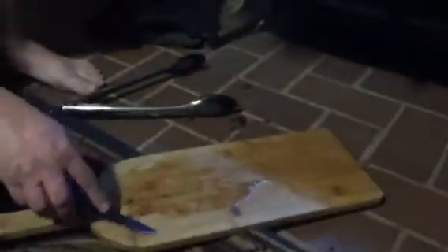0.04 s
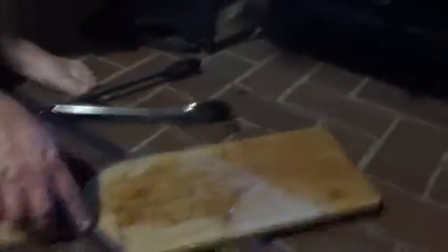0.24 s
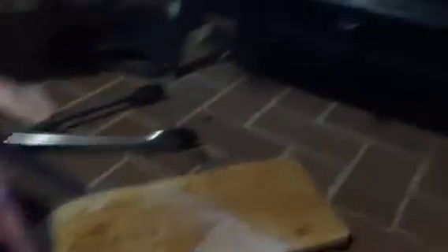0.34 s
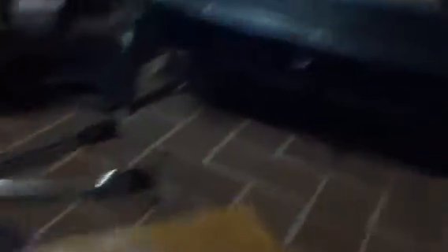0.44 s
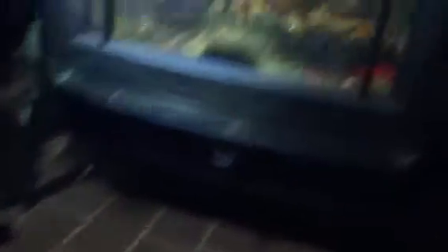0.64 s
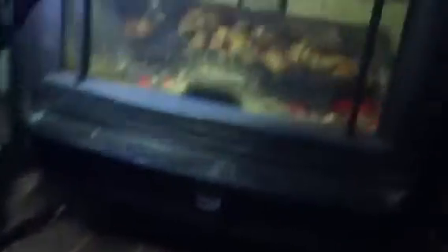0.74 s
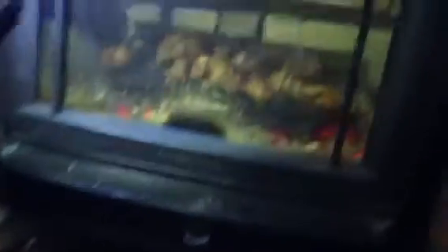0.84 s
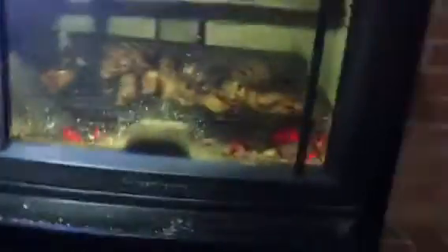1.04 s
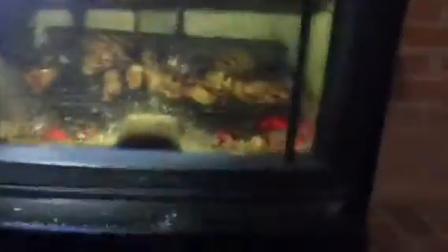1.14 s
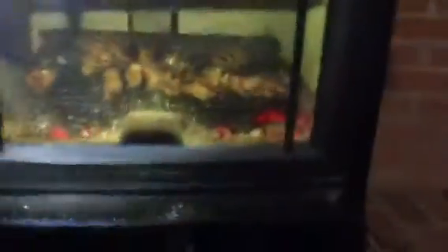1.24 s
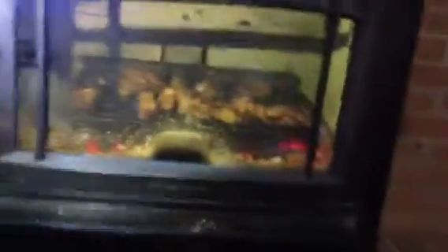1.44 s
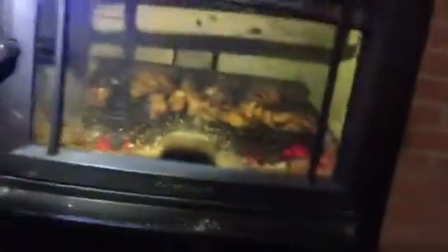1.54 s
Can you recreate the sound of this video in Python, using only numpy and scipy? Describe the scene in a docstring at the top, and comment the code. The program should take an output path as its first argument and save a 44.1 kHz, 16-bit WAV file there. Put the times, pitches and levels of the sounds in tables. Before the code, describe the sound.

Wood knocks and rattles on brick as a knife and tongs are laid down, first spaced, then in a quick tumbling run, fading to small taps and a soft rustle in a lightly echoing room.

```python
"""A brick hearth: a wooden board rattles while a knife and tongs knock against it and are laid down.
Each knock sums the board's decaying modes with a short noise crack; steel rings as clusters of partials.
Filtered noise makes short gritty bursts, a spray of tiny ticks and a late soft rustle.
Noise echoes give a near-wall reflection and a tail, over a stove fan's hum and faint hiss."""
import sys
import numpy as np
from scipy import signal
from scipy.fft import rfft, irfft
from scipy.io import wavfile
from scipy.ndimage import uniform_filter1d

SR = 44100
rng = np.random.default_rng(int(sys.argv[2]) if len(sys.argv) > 2 else 0)


def waveform_to_disk(signal):
    """Save audio, clipped to [-1, 1], as 16-bit WAV at the path in sys.argv[1]."""
    frames = np.transpose(np.atleast_2d(signal))
    scaled = np.clip(frames, -1, 1) * 32767
    samples = np.round(scaled).astype(np.int16)
    wavfile.write(sys.argv[1], SR, samples)


N = 70560  # length in samples


def undb(db):
    """Turn decibels into an amplitude factor."""
    return 10 ** (np.asarray(db) / 20)


def unit(x):
    """Scale x to an RMS of 1."""
    return x / np.sqrt(np.mean(x ** 2))


def shaped(x, table, length):
    """Colour x by (f/Hz, level/dB) points joined on a log-frequency axis."""
    hz, db = np.array(table, float).T
    f = np.maximum(np.fft.rfftfreq(length, 1 / SR), 1)
    gain = undb(np.interp(np.log(f), np.log(hz), db))
    return irfft(rfft(x, length) * gain, length)


def band(x, hz, width):
    """Steep band-pass around hz, width in Hz."""
    edges = np.clip([hz - width / 2, hz + width / 2], 20, .45 * SR)
    return signal.sosfilt(signal.butter(3, edges, "bandpass", fs=SR, output="sos"), x)


def walk(rate):
    """Slow random wander of RMS 1: held random values, rate per second, smoothed twice."""
    hold = int(SR / rate)
    steps = np.repeat(rng.standard_normal(N // hold + 1), hold)
    return unit(uniform_filter1d(uniform_filter1d(steps, hold), hold)[:N])


def add(out, s, x):
    """Mix x into out at s seconds."""
    i = int(s * SR)
    out[i:i + len(x)] += x[:N - i]


def decay(t, t60):
    """Exponential fall that loses 60 dB in t60 seconds."""
    return np.exp(-np.log(1000) * t / t60)


def ring(hz, db, t60, rise_s):
    """Sum of decaying modes, each swelling over its own rise time."""
    t = np.arange(SR // 3) / SR
    swell = (1 - np.exp(-t / rise_s[:, None])) ** 2
    modes = swell * decay(t, t60[:, None]) * np.sin(2 * np.pi * hz[:, None] * t)
    return undb(db) @ modes


# Spectral tilt of the fan's air noise, relative: f/Hz, level/dB (per Hz)
AIR_TILT = [(18, -48.5), (30, -22), (131, 1.5), (227, -6), (303, -6), (962, -22.5), (1250, -15),
            (1390, -23), (1590, -24.5), (6050, -28), (16000, -36.5)]
# Pitches of the three hum lines: f/Hz
HUM_HZ = [63, 123.2, 161.3]
# Irregular, chance-like level wander of each hum line, before the added waver:
# t/s, then level/dB (RMS) of each line
HUM_LEVELS = [(0.0, -85, -60, -51.5), (0.062, -83, -54.5, -93), (0.28, -78, -63, -59),
              (0.316, -70, -56, -103), (0.502, -91, -76, -83), (0.552, -83, -73, -56),
              (0.622, -80, -70, -69), (0.69, -78, -50.5, -59), (0.752, -80, -72, -64),
              (0.832, -83, -57, -68), (0.89, -72, -68, -71), (0.984, -79, -60.5, -71),
              (1.032, -77, -84, -55.5), (1.122, -82, -61.5, -72.5), (1.572, -81.5, -65, -66),
              (1.6, -80, -73.5, -75)]
AIR_DB = -60.5  # RMS before its slow drift
HUM_WAVER_DB, HUM_WAVER_TURNS = 3, 0.24  # RMS wander of level, and of phase in cycles


def stove():
    """Fan: drifting coloured air noise with three hum lines that waver in level and phase."""
    t = np.arange(N) / SR
    air = undb(AIR_DB) * unit(shaped(rng.standard_normal(N), AIR_TILT, N))
    s, *levels = np.array(HUM_LEVELS).T
    hum = np.zeros(N)
    for hz, db in zip(HUM_HZ, levels):
        level = np.interp(t, s, db) + HUM_WAVER_DB * walk(20)
        turns = hz * t + HUM_WAVER_TURNS * walk(11)
        hum += np.sqrt(2) * undb(level) * np.sin(2 * np.pi * turns)
    return air * undb(.8 * walk(3.3)) + hum


# Centre pitch of each steel mode: f/Hz
STEEL_HZ = [1604, 2085, 2470, 3370, 3770, 4230, 4990, 5400, 5780, 6200, 8100, 9000, 11640]
# The same modes, before each touch's leaning and ring factor: level/dB, t60/s
STEEL_MODES = [(-2.5, .12), (2, 0.073), (-5.5, 0.051), (0.5, .12), (4, 0.047), (-12, 0.042), (-9.5, 0.05),
               (-12, 0.062), (0, .13), (-1, 0.074), (-13.5, .15), (-6.5, 0.12), (-1, 0.082)]
# Touches of steel: t/s, level/dB, best-excited f/Hz, reach/octaves, ring-time factor, contact/ms
CLINKS = [(.001, -62, 2386, 0.6, 1.84, 0.15), (.003, -47.5, 4950, 0.1, 2.5, 1.2),
          (.140, -43.5, 6940, 1, 0.48, .3), (.142, -42.5, 3770, .06, 0.98, 1.2),
          (.146, -55.5, 9900, 0.32, 1.6, 5.6), (.150, -44.5, 5900, .2, .9, 3.6),
          (.159, -41, 2090, .15, .4, 2), (.240, -64, 8100, .1, 1.5, 4.), (.249, -69, 11000, 0.33, 1.9, 6.8),
          (1.248, -40.5, 2085, .08, 1.9, 0.23), (1.266, -54, 2085, .08, 0.91, 2.7)]
STEEL_SPLIT = 0.013  # relative pitch spread within a mode's cluster
PARTIALS = 5  # per mode


def steel():
    """Blade and tongs ring thin and rough; each touch favours the modes near one pitch."""
    out = np.zeros(N)
    hz = np.repeat(STEEL_HZ, PARTIALS)
    db, t60 = np.repeat(STEEL_MODES, PARTIALS, axis=0).T
    chance = rng.standard_normal((len(CLINKS), 2, len(hz)))
    for (s, level, best_hz, reach, ring_on, contact_ms), (pitch_luck, level_luck) in zip(CLINKS, chance):
        lean_db = -6 * (np.log2(hz / best_hz) / reach) ** 2
        rise_s = .5 / hz + contact_ms / 1000
        partial_db = level + db + lean_db + 2.2 * level_luck
        add(out, s, ring(hz * (1 + STEEL_SPLIT * pitch_luck), partial_db, ring_on * t60, rise_s))
    return out


# Decay of the tail by band: f/Hz, t60/s
ROOM_DECAY = [(600, 0.48), (1000, 0.68), (2000, .5), (4000, 0.27), (8000, 0.34), (14000, 0.17)]
# Balance of the same bands, before the overall tail gain: f/Hz, level/dB
ROOM_TONE = [(600, -2), (1000, 1), (2000, -2), (4000, -8.5), (8000, -9), (14000, -12.5)]
ROOM_DB = -10  # gain of the whole tail
WALL_S, WALL_SPREAD_S, WALL_DB = .022, 0.019, -8.5  # echo centre, smear and gain
WALL_HZ, WALL_WIDTH_HZ = 1500, 2200
ROOM_LOW_HZ = 420  # the small board sends little below this into the room


def room(feed):
    """A smeared echo from the near wall and a tail that dies band by band, as noise convolution."""
    low_cut = signal.butter(6, ROOM_LOW_HZ, "highpass", fs=SR, output="sos")
    t = np.arange(SR) / SR
    tail = np.zeros(SR)
    for (hz, t60), (_, db) in zip(ROOM_DECAY, ROOM_TONE):
        fall = decay(t, t60) * (1 - np.exp(-t / 0.019))  # soft onset
        fall /= np.sqrt(np.sum(fall ** 2))
        tail += undb(db) * band(rng.standard_normal(SR), hz, .7 * hz) * fall
    smear = np.exp(-.5 * ((t - WALL_S) / WALL_SPREAD_S) ** 2)
    smear /= np.sqrt(np.sum(smear ** 2))
    wall = band(rng.standard_normal(SR), WALL_HZ, WALL_WIDTH_HZ) * smear
    response = undb(ROOM_DB) * tail + undb(WALL_DB) * wall
    return signal.fftconvolve(signal.sosfilt(low_cut, feed), response)[:N]


# Points where each knock's colour is set: f/Hz
STRIKE_HZ = [210, 478, 550, 675, 930, 1290, 1850, 3500, 6700, 12000]
# Knocks: t/s, room send level/dB, contact/ms, then strike level/dB near each of STRIKE_HZ;
# where a knock lands on the board sets its colour
KNOCKS = [(0.127, -9.5, 4.2, -65, -66, -61.5, -58, -58, -56.5, -54, -70, -50, -58),
          (0.139, -6.5, 0.44, -62.5, -32.5, -41, -28.5, -44.5, -29.5, -39, -29, -37.5, -30),
          (0.1425, 1, 0.37, -55, -61, -40, -31, -59, -68, -26, -31.5, -48, -40),
          (0.2075, -3, 0.54, -46, -28.5, -18.5, -26.5, -23.5, -25, -30.5, -26, -45, -54),
          (0.242, 5, 1.3, -47, -32.5, -36, -36, -36.5, -30.5, -34, -42, -45, -66),
          (0.3155, -4.5, 1.05, -42.5, -28.5, -10.5, -28.5, -21, -73, -11, -29.5, -37, -52),
          (0.321, 2.5, 0.94, -70, -32.5, -24, -28, -28, -19, -46, -33.5, -61, -69),
          (0.522, 6.5, 1.8, -68, -65, -87, -72, -49.5, -55.5, -51, -48.5, -57, -70),
          (0.545, -12, 0.84, -33.5, -23, -30, -15.5, -14, -9, -11.5, -1.5, -19.5, -34),
          (0.5765, -7.5, 0.23, -42.5, -20, -38.5, -18.5, -21, -18, -18.5, -12.5, -33, -65),
          (0.59, 3.5, 1.8, -46, -27.5, -39.5, -33.5, -27, -21.5, -21, -40, -66, -74),
          (0.608, -6, 0.7, -71, -53, -50, -56, -25, -50, -43, -57.5, -65, -69),
          (0.63, -5, 1, -45, -51.5, -31.5, -15.5, -20, -35, -27.5, -23, -58, -72),
          (0.653, 2, 0.55, -44, -64, -56, -59, -37.5, -29.5, -49, -58, -61, -72),
          (0.686, -7.5, 0.77, -33.5, -28.5, -33.5, -17, -17.5, -21.5, -18.5, -13, -29.5, -59.5),
          (0.716, 3.5, 2.1, -38.5, -20.5, -66.5, -43.5, -27.5, -40, -35, -57, -45.5, -68),
          (0.736, -5, 2, -46, -34, -38, -18.5, -21.5, -35.5, -29, -29.5, -42.5, -66.5),
          (0.752, -6, 1.57, -39.5, -28, -44, -35.5, -20, -23.5, -16, -29, -59, -63),
          (0.776, -7.5, 0.67, -54, -52.5, -42.5, -25, -28, -43, -45, -39, -56, -78),
          (0.791, -17, 0.7, -59.5, -31.5, -59.5, -30.5, -52, -55, -57, -46.5, -79.5, -81),
          (0.804, -10.5, 1.7, -77.5, -59, -63.5, -31.5, -32, -64, -47, -46, -77, -84.5),
          (0.832, -3, 1.66, -71, -50.5, -36.5, -41, -55.5, -63, -47, -53, -80, -85),
          (0.904, -11, 5, -63, -46.5, -49.5, -34, -47, -70, -53, -65, -87, -87.5),
          (1.045, -2, 2.35, -81.5, -52.5, -64.5, -34.5, -47, -47, -47.5, -69, -82, -89),
          (1.057, -2.5, 2.8, -82, -57, -53, -44, -45.5, -66, -41.5, -56.5, -65.5, -72),
          (1.126, -5.5, 2.2, -63, -64, -65, -47, -56.5, -67.5, -60.5, -68, -84.5, -88),
          (1.247, -4, 0.65, -50.5, -49, -21.5, -32.5, -36.5, -38, -24.5, -34.5, -35.5, -53),
          (1.325, -9.5, 0.7, -52, -64.5, -76, -51, -69, -77.5, -51, -60, -78.5, -91)]
# Modes of the board, before each knock's colour and detune: f/Hz, level/dB, t60/s
BOARD_MODES = [(204, 7.5, 0.048), (482.5, -4, 0.16), (563.6, 0, 0.04), (671.5, -0.5, .09),
               (697.3, -4.5, 0.081), (878, 1.5, 0.04), (966, 1.5, 0.048), (1127, -13, 0.088),
               (1302, -3.5, 0.035), (1360, -9, .05), (1637, -5, 0.037), (1757, 3.5, 0.025),
               (2092, -7, 0.027), (2359, -9, 0.027), (2908, -7.5, 0.018), (3453, -10, 0.02),
               (3630, -9.5, 0.019), (4075, -9.5, 0.017)]
# Ring time of the crack in the three top strike bands: t60/s
CRACK_T60_S = [0.014, 0.014, 0.0027]
RISE_CYCLES, DETUNE, SCATTER_DB = 0.9, 0.0091, 3.5  # rise per mode; relative pitch and level spread
BOARD_DB, CRACK_DB = 4.5, -4
# The walls also get the many weak modes that miss the microphone
SPREAD_DB, SPREAD_T60_S = 0.5, .03


def board():
    """Every knock rings slightly detuned wood modes and a noisy crack; returns direct and room feed."""
    direct, feed = np.zeros((2, N))
    hz, db, t60 = np.array(BOARD_MODES).T
    chance = rng.standard_normal((len(KNOCKS), 2, len(hz)))
    t = np.arange(SR // 3) / SR
    for (s, send_db, contact_ms, *colour), (pitch_luck, level_luck) in zip(KNOCKS, chance):
        touch_s = abs(contact_ms) / 1000
        strike_db = np.interp(np.log(hz), np.log(STRIKE_HZ), colour)
        mode_db = BOARD_DB + db + strike_db + SCATTER_DB * level_luck
        knock = ring(hz * (1 + DETUNE * pitch_luck), mode_db, t60, RISE_CYCLES / hz + touch_s)

        grit = np.array([unit(band(rng.standard_normal(len(t)), f, 0.6 * f)) for f in STRIKE_HZ[1:]])
        falls = decay(t, np.array(CRACK_T60_S)[:, None]) * (1 - np.exp(-t / (0.23 * touch_s)))
        crack = undb(CRACK_DB + np.array(colour[-3:])) @ (grit[-3:] * falls)
        spread = undb(SPREAD_DB + np.array(colour[1:])) @ grit * decay(t, SPREAD_T60_S)
        add(direct, s, knock + crack)
        add(feed, s, undb(send_db) * (0.82 * knock + crack + spread))
    return direct, feed


# Short noise bursts, levels before the envelope and roughness: middle t/s, half-length/s, level/dB,
# centre f/Hz, width/Hz
BURSTS = [(0.138, .005, -47.5, 2605, 1990), (0.143, 0.0018, -42.5, 11800, 7100),
          (0.319, 0.0041, -59.5, 10800, 7025), (0.536, 0.0034, -57, 3000, 900),
          (0.914, .01, -52.5, 727, 300), (1.065, .006, -52, 796, 400), (1.132, 0.0047, -57.5, 710, 300),
          (1.46, 0.042, -62, 1480, 2000), (1.061, 0.016, -60, 1770, 2400),
          (1.229, 0.016, -59.5, 1300, 1600), (1.595, 0.011, -63, 1185, 709)]


def noise_bursts():
    """Bell-shaped band noise: gritty scuffs, bright tails of knocks, and the low part of the rustle."""
    t = np.arange(N) / SR
    out = np.zeros(N)
    for s, half, db, hz, width in BURSTS:
        level = undb(db + 0.93 * walk(400))
        swell = np.exp(-.5 * ((t - s) / half) ** 2)
        out += level * swell * unit(band(rng.standard_normal(N), hz, width))
    return out


# Level automation of the tick spray: t/s, level/dB
SPRAY_LEVELS = [(0.69, -41), (0.7, -61), (0.76, -59), (0.826, -79), (0.86, -93)]
SPRAY_PER_S, SPRAY_SCATTER_DB = 2500, 5  # tick density; mean random boost of a tick
SPRAY_HZ, SPRAY_WIDTH_HZ = 6385, 3200


def spray():
    """Loose steel chatters in dense tiny ticks while the board settles: band-passed random impulses."""
    s, db = np.array(SPRAY_LEVELS).T
    level = np.interp(np.arange(N) / SR, s, db, left=-120, right=-120)
    hits = rng.random(N) < SPRAY_PER_S / SR
    force = undb(SPRAY_SCATTER_DB * rng.exponential(size=N)) * rng.standard_normal(N)
    return undb(level) * unit(band(hits * force, SPRAY_HZ, SPRAY_WIDTH_HZ))


# Level automation of the rustle, before its flutter: t/s, level/dB
RUSTLE_LEVELS = [(1.36, -79), (1.384, -91), (1.432, -60.5), (1.51, -66), (1.542, -76), (1.6, -80.5)]
RUSTLE_HZ, RUSTLE_WIDTH_HZ = 2990, 6000


def rustle():
    """A soft broad swish, likely cloth moving: wide band noise with a fluttering level."""
    s, db = np.array(RUSTLE_LEVELS).T
    level = np.interp(np.arange(N) / SR, s, db, left=-120)
    flutter = 1.5 * walk(41.26)
    swish = unit(band(rng.standard_normal(N), RUSTLE_HZ, RUSTLE_WIDTH_HZ))
    return undb(level + flutter) * swish


STEEL_SEND_DB = -5  # share of the steel that reaches the room


def scene():
    """Mix the direct sources with the room's answer, the stove and the rustle."""
    knocks, knock_feed = board()
    clinks = steel()
    bursts = spray() + noise_bursts()
    feed = knock_feed + undb(STEEL_SEND_DB) * clinks + bursts
    return (knocks + clinks + bursts + room(feed) + stove() + rustle())[None]


LIMIT = .85  # ceiling of the soft limiter, in full-scale amplitude
BASS_HZ, TOP_HZ = 40, 16100  # low and high cutoffs


def record(dry):
    """The phone rounds the loudest peaks, loses the deepest bass and cuts the top."""
    rounded = LIMIT * np.tanh(dry / LIMIT)
    bass_cut = signal.butter(2, BASS_HZ, "highpass", fs=SR, output="sos")
    top_cut = signal.ellip(10, .2, 80, TOP_HZ, fs=SR, output="sos")
    return signal.sosfilt(top_cut, signal.sosfilt(bass_cut, rounded))


dry = scene()
out = record(dry)
waveform_to_disk(out)
```